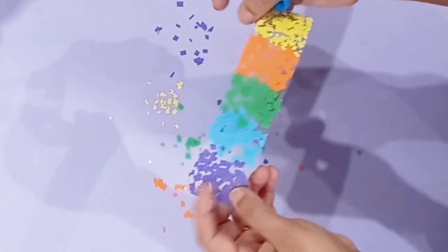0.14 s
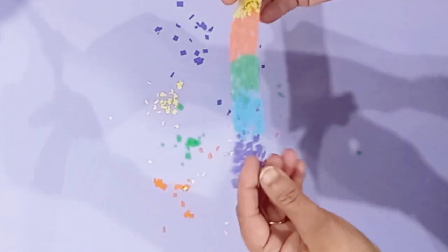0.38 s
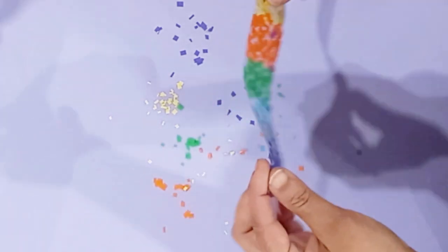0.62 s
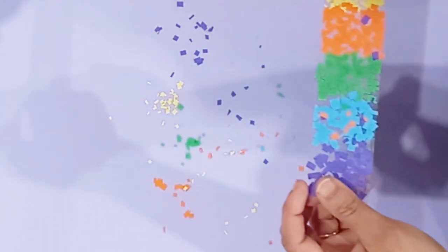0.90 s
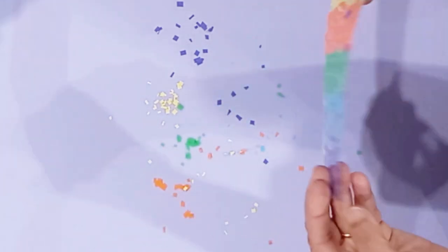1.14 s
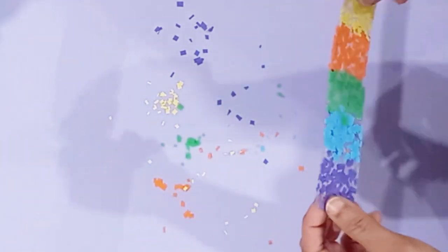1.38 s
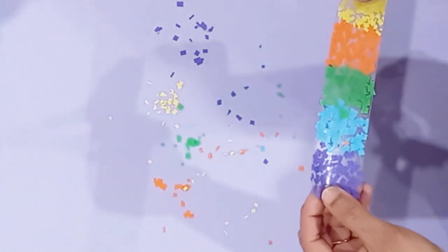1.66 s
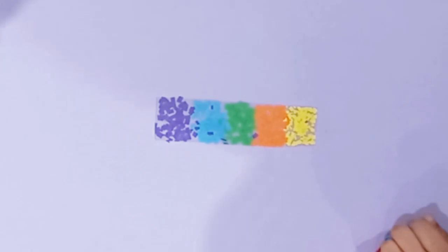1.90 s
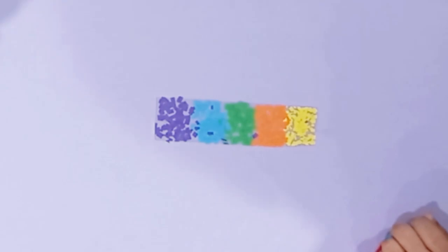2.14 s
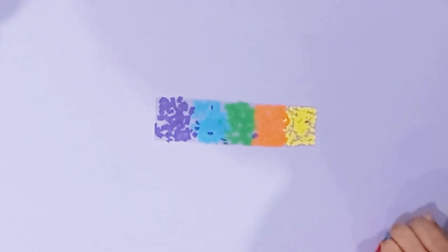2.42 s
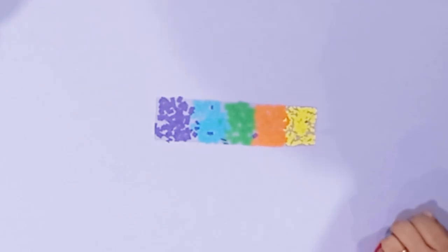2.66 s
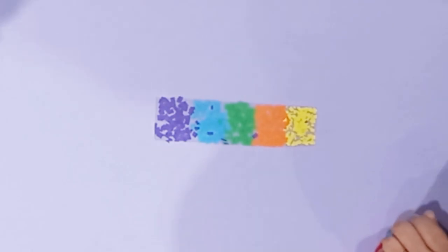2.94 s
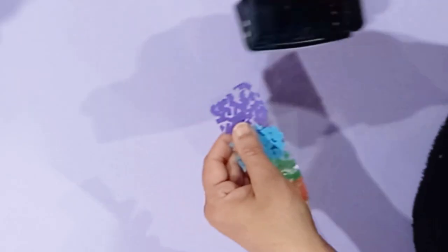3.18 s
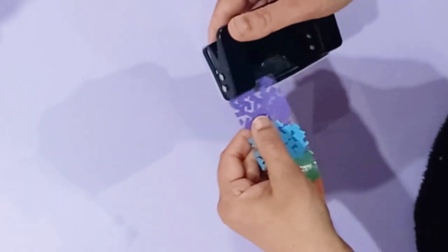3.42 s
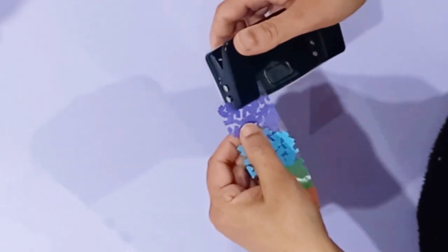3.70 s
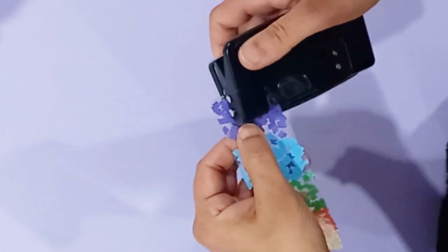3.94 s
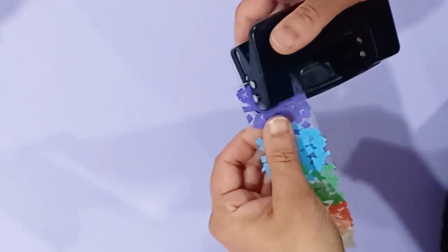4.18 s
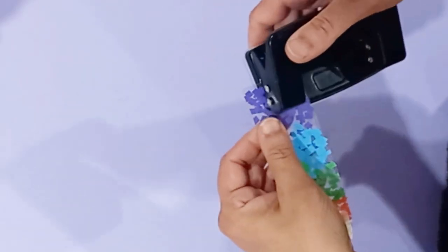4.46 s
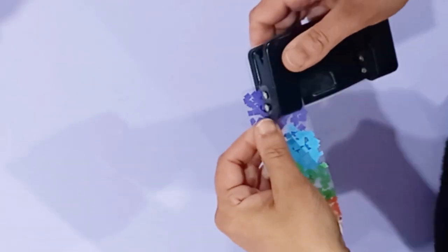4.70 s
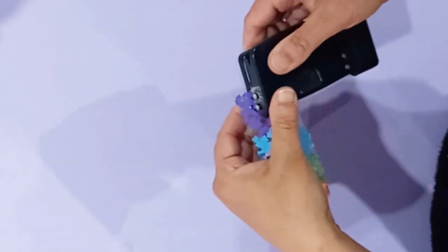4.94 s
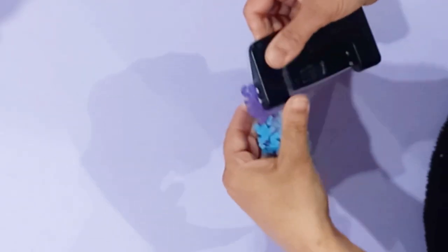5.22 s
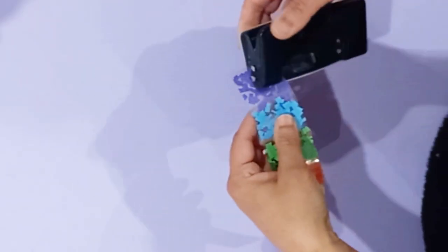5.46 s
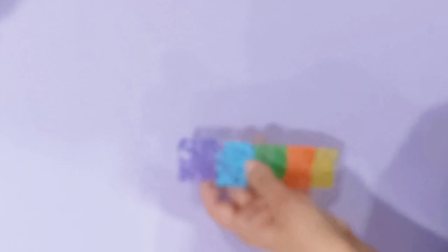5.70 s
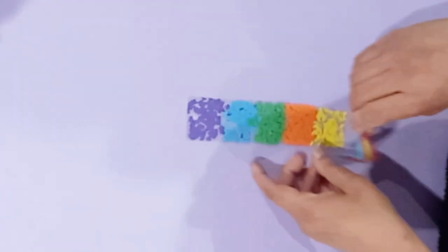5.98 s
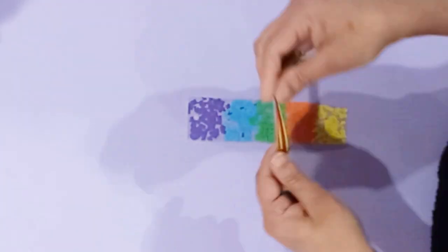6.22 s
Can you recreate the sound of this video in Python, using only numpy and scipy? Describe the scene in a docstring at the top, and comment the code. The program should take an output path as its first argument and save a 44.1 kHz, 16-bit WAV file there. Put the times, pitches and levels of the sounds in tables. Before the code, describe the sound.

Taped paper strip ticks and crinkles in a quiet room, soft table thumps and tool knocks follow, then a hole punch clacks twice.

```python
"""In a small quiet room, hands slide over a strip of taped paper on a table; the tape ticks and crinkles.
Soft thumps in the table top mingle with tools that knock further off and ring while they are pushed about.
Late on, a hole punch creaks, bites and springs back. The sounds are noise bursts sent through resonances.
Three times a moment of sound fades in, breaks off and starts again, as at a splice."""
import sys
import numpy as np
from scipy import signal
from scipy.io import wavfile
from scipy.ndimage import uniform_filter1d

SR = 44100
rng = np.random.default_rng(int(sys.argv[2]) if len(sys.argv) > 2 else 0)


def attenuation_scalar(level_db):
    """Turn a level in dB into a linear amplitude multiplier (20 dB per decade)."""
    decades = np.asarray(level_db, float) / 20
    return 10 ** decades


def store_wav(level_fs):
    """Save 16-bit WAV to argv[1]."""
    pcm = np.round(np.clip(np.atleast_2d(level_fs), -1, 1) * 32767)
    wavfile.write(sys.argv[1], SR, pcm.T.astype(np.int16))


N = 280015  # length in samples


def evened(x):
    """Scales a sound to an rms of 1."""
    return x / np.sqrt(np.mean(x ** 2) + 1e-20)


def peaked(x):
    """Scales a sound so that its highest peak is 1."""
    return x / (abs(x).max() + 1e-20)


def read(points, hz):
    """Reads a table of values over pitch, with pitch on a logarithmic axis."""
    f, value = np.transpose(points)
    return np.interp(np.log(hz + 1), np.log(f + 1), value)


def add(mix, s, sound):
    """Mixes a sound in at time s, cutting off what runs past the end."""
    part = mix[..., round(s * SR):][..., :sound.shape[-1]]
    part += sound[..., :part.shape[-1]]


def band(x, lo_hz, hi_hz):
    """Keeps the pitches between two limits."""
    edges = [lo_hz, min(hi_hz, 0.45 * SR)]
    return signal.sosfilt(signal.butter(2, edges, "band", fs=SR, output="sos"), x)


def resonate(x, hz, width_hz):
    """A resonance of gain 1, at a fixed or moving pitch: shift it to zero, smooth, shift back."""
    turn = np.exp(2j * np.pi * np.cumsum(hz * np.ones(x.shape[-1])) / SR)
    r = np.exp(-np.pi * width_hz / SR)
    return 2 * (turn * signal.lfilter([1 - r], [1, -r], x / turn)).real


def ring(x, modes):
    """Lets a push set off a set of dying sines, one for each way the object can vibrate."""
    t = np.arange(SR // 4) / SR
    sines = sum(attenuation_scalar(db - 60 * t / t60) * np.sin(2 * np.pi * hz * t) for hz, db, t60 in modes)
    return signal.oaconvolve(x, sines)[:len(x)]


def grit(shape, spread_db):
    """Noise whose samples differ widely in size, like many tiny snaps."""
    return rng.standard_normal(shape) * attenuation_scalar(spread_db * np.minimum(rng.exponential(1, shape), 5))


def swell(size, length_s, rise):
    """An envelope that rises over a share of its length and dies away."""
    u = np.arange(size) / SR / max(length_s, 1e-3)
    return np.minimum(u / rise, 1) * np.exp(-(u / 1.61) ** 2)


def bell(size, length_s):
    """An envelope that swells to the middle of its frame and fades alike."""
    return np.exp(-(2 * (np.arange(size) - size // 2) / SR / length_s) ** 2)


def random_patches(noise, tall, wide):
    """Smooths noise over pitch rows and time columns into soft patches of rms 1."""
    return evened(uniform_filter1d(uniform_filter1d(noise, tall, axis=0), wide, axis=1))


def patchy(x, depth_db):
    """Random patches a few hundred hertz wide and some forty milliseconds long swell and sink."""
    hz, t, z = signal.stft(x, SR, nperseg=256)
    patches = random_patches(rng.standard_normal((len(t), len(hz))).T, tall=3, wide=14)
    return signal.istft(z * attenuation_scalar(depth_db * patches), SR, nperseg=256)[1][:, :N]


# Spectrum of the room tone: f/Hz, relative level per hertz/dB
AIR_SPECTRUM = [(15, -100), (25, -59), (64, -18.5), (97, -2), (130, 2.5), (157, -8.5), (223, -2.5),
                (607, -16), (3920, -29), (7000, -37.5), (10500, -36.5), (13600, -25), (16000, -30.5)]
# How alike the room tone is left and right: f/Hz, likeness (1 = the same)
AIR_LIKENESS = [(100, 0.22), (400, 0.021), (2000, 0.0082)]
AIR_DB = -50.5


def room_tone():
    """The still air of the room: random short-time spectra with faint drifting patches."""
    hz = np.fft.rfftfreq(1024, 1 / SR)
    a, b, c, d, noise = rng.standard_normal((N // 256 + 5, 513, 5)).T
    patches = random_patches(noise, tall=10, wide=20)
    same = np.clip(read(AIR_LIKENESS, hz), -1, 1)[:, None]
    left = a + 1j * b
    right = same * left + np.sqrt(1 - same ** 2) * (c + 1j * d)
    colour = attenuation_scalar(read(AIR_SPECTRUM, hz)[:, None] + 0.13 * patches)
    tone = signal.istft(np.array([left, right]) * colour, nperseg=1024, noverlap=768)[1][:, :N]
    return attenuation_scalar(AIR_DB + np.array([[0.8], [-0.8]])) * evened(tone)  # a little louder on the left


# Hands and paper sliding, levels drawn as lines from row to row: t/s, dull rub level/dB, bright hiss level/dB
SLIDE_LEVELS = [(0, -87, -80.5), (.65, -61.5, -66.5), (.85, -71, -73.5), (1.17, -59.5, -64),
                (1.4, -95, -78.5), (2.001, -51.5, -70.5), (2.37, -66, -74), (2.48, -53.5, -72),
                (2.62, -61.5, -64), (2.9, -47.5, -58.5), (2.99, -48.5, -60.5), (3.06, -43, -52.5),
                (3.21, -62.5, -72), (3.7, -66.5, -82.5), (3.92, -54.5, -67), (4.06, -60.5, -75),
                (4.75, -82, -81.5), (4.951, -54.5, -67), (5.2, -67, -71), (5.9, -61.5, -69),
                (6.08, -55, -52.5), (6.105, -63, -74), (6.35, -63, -64.5)]
DRAG_START_S, DRAG_END_S = 1.85, 3.1  # span in which tools are pushed about
DRAG_SHARE = 1.3  # share of the tools' ring in the rub
RUB_PATCHY_DB = 3.5  # the rub catches unevenly, here and there in pitch and time


def slides():
    """Grainy rubbing, unrelated left and right, that wakes two tool resonances while tools are pushed."""
    s, rub_db, hiss_db = np.transpose(SLIDE_LEVELS)
    t = np.arange(N) / SR
    grains = grit((2, N), 6.2)
    dragging = (t > DRAG_START_S) & (t < DRAG_END_S)
    tool_ring = sum(resonate(grains, hz, width) for hz, width, _ in TOOL_RESONANCES[1:3])
    rub = band(grains, 180, 2460) + DRAG_SHARE * dragging * tool_ring
    rub = evened(patchy(rub, RUB_PATCHY_DB))
    hiss = evened(band(grains, 2000, 11060))
    return attenuation_scalar(np.interp(t, s, rub_db)) * rub + attenuation_scalar(np.interp(t, s, hiss_db)) * hiss


# How fast the echo dies at each pitch: f/Hz, time to fall by 60 dB/s
ROOM_DECAY = [(300, 0.067), (2000, 0.19), (14000, 0.088)]


def room(x, start=150):
    """Echoes off the walls: sparse taps of random sign, dying by pitch, other taps on each side."""
    taps = np.zeros((2, SR // 3))
    slots = np.arange(start, SR // 3 - 8, 8)  # one tap in every 8 samples
    at = slots + rng.integers(0, 8, (2, len(slots)))
    np.put_along_axis(taps, at, rng.choice([-1., 1.], at.shape), 1)
    hz, t, z = signal.stft(taps, SR, nperseg=128)
    decay = attenuation_scalar(-60 * t / read(ROOM_DECAY, hz)[:, None])
    tail = signal.istft(z * decay, SR, nperseg=128)[1]
    return signal.oaconvolve(x[None], tail / np.linalg.norm(tail[0]), axes=1)[:, :len(x)]


LAG = 7  # samples by which near sounds reach the right microphone later


def near(x, wet_db):
    """Direct sound, a little later on the right, where the treble's phase wanders at random; room behind."""
    x = band(x, 300, 17000)
    hz, t, z = signal.stft(np.roll(x, LAG), SR, nperseg=128)
    wander = random_patches(rng.standard_normal((len(t), len(hz))).T, tall=3, wide=12)
    phase = np.minimum(hz / 4000, 1.6)[:, None] * wander  # radians, growing with pitch
    right = signal.istft(z * np.exp(1j * phase), SR, nperseg=128)[1][:N]
    return np.array([x, right]) + attenuation_scalar(wet_db) * room(x)


def paper_colour(x, hz, body_db):
    """Broad treble with a soft peak, over the duller body of the sheet."""
    treble = band(x, 1330, 28600) + 2.3 * resonate(x, hz, 870)
    return peaked(treble) + attenuation_scalar(body_db) * peaked(band(x, 470, 4000))


# Single snaps of the tape: start t/s, level/dB, colour f/Hz, low body relative level/dB
TAPE_TICKS = [(0.083, -40.5, 7700, -27), (0.562, -40, 12800, -28), (0.728, -36, 8000, -30.5),
              (0.7344, -30, 8060, -18), (0.7647, -28.5, 7800, -7), (1.5476, -36.5, 10200, -4.5),
              (4.1495, -41, 7350, -2), (4.806, -46, 6000, 1), (5.609, -48, 8850, -20),
              (5.677, -39, 7700, -36), (5.835, -33.5, 8800, -7), (5.9154, -30, 11600, -33),
              (6.241, -40, 8100, -13)]
# Bunches of tiny snaps: middle t/s, level/dB, colour f/Hz, low body relative level/dB, length/s
TAPE_CRINKLES = [(0.118, -53, 7500, -18, 0.027), (0.501, -47, 12000, -4.5, 0.076),
                 (0.697, -45, 11900, -17, .03), (3.889, -50, 8000, 0, 0.033),
                 (3.991, -48, 9900, -11, 0.024), (0.166, -47, 8550, 2.5, 0.0089),
                 (0.312, -41, 8050, -3.5, 0.029), (0.766, -32, 7800, -12, 0.013),
                 (0.929, -32, 5000, -11, 0.0081), (0.94, -28, 10600, -11, 0.023),
                 (1.038, -31.5, 8500, -16, 0.012), (1.072, -36, 11100, -30, 0.0065),
                 (1.191, -31.5, 8200, -6, 0.014), (1.287, -34.5, 9500, -11, 0.0077),
                 (1.302, -28.5, 9700, -15, 0.016), (4.821, -40.5, 10100, -2, 0.013),
                 (5.93, -35, 8700, -34, 0.046)]


def tape():
    """Ticks are one or two milliseconds of snapping; crinkles are longer bunches that swell and fade."""
    out = np.zeros(N)
    for (s, db, hz, body_db), snap in zip(TAPE_TICKS, grit((len(TAPE_TICKS), 1024), 0.5)):
        snap = snap * swell(size=1024, length_s=0.0013, rise=0.3)
        add(out, s, attenuation_scalar(db) * paper_colour(snap, hz, body_db))
    bunches = grit((len(TAPE_CRINKLES), 4096), 2.9)
    for (s, db, hz, body_db, length_s), snaps in zip(TAPE_CRINKLES, bunches):
        start_s = s - len(snaps) / 2 / SR
        snaps = snaps * bell(size=4096, length_s=length_s)
        add(out, start_s, attenuation_scalar(db) * paper_colour(snaps, hz, body_db))
    return out


# Pushes on the table top: middle t/s, level/dB, hardness as rough upper part relative level/dB, length/s
TABLE_THUMPS = [(0.564, -42, -27, 0.016), (1.909, -27, -1.5, 0.035), (2.492, -54, 18.5, 0.064),
                (2.544, -34.5, -2.5, 0.041), (2.724, -39.5, 13.5, 0.044), (2.765, -50, 19, .03),
                (2.864, -41.5, 13, 0.046), (2.93, -47.5, -1, 0.04), (3.035, -38.5, -3, 0.07),
                (5.896, -53, -32, 0.44)]
# Lowest way the table top vibrates: f/Hz, level/dB, time to fall by 60 dB/s
TABLE_MODE = [(129.8, 0, 0.035)]


def thumps():
    """A push rings the table top; its roughness grinds above, and heavy ones shake the floor below."""
    out = np.zeros((2, N))
    table_hz = TABLE_MODE[0][0]
    noises = rng.standard_normal((len(TABLE_THUMPS), 3, 12000))
    for (s, db, hard_db, length_s), rough in zip(TABLE_THUMPS, noises):
        push = bell(size=12000, length_s=length_s)
        grind = push * (rough[2] + 1.35 * rough[:2])  # partly shared by left and right
        hum = push * np.sin(2 * np.pi * table_hz * np.arange(len(push)) / SR)
        low = peaked(ring(hum, TABLE_MODE)) + 0.55 * peaked(resonate(grind, table_hz, 53))
        floor = attenuation_scalar(db + 18.5) * peaked(band(grind, 61, 97))  # grows faster than the thump itself
        upper = band(grind, 100, 1270) + 5.7 * band(grind, 84, 380) + 1.8 * resonate(grind, 592, 76)
        thump = low + floor + attenuation_scalar(hard_db) * peaked(upper)
        add(out, s - len(push) / 2 / SR, attenuation_scalar(db) * thump)
    return out * attenuation_scalar(np.array([[1.2], [-1.2]]))  # a little louder on the left


# Tools knocking further off: start t/s, level/dB, treble relative level/dB
TOOL_KNOCKS = [(1.8946, -22, -1.5), (2.2186, -28.5, -10), (2.2695, -26, -14), (2.3994, -37, -37),
               (2.6496, -28.5, -14), (2.8527, -26.5, -40)]
# Resonances of a tool, two of them also woken by sliding: f/Hz, width/Hz, relative level/dB
TOOL_RESONANCES = [(1340, 620, -4), (2354, 72, -5), (399, 45, -7), (632, 61, -14.5), (7310, 130, -14.5)]


def knocks():
    """A short rattle rings the tool under a broad clatter; it reaches us mostly by the walls."""
    out = np.zeros((2, N))
    for (s, db, treble_db), rattle in zip(TOOL_KNOCKS, grit((len(TOOL_KNOCKS), 8192), 2.6)):
        rattle = rattle * swell(size=8192, length_s=0.0073, rise=0.17)
        rung = sum(attenuation_scalar(level_db) * resonate(rattle, hz, width) / np.sqrt(width)
                   for hz, width, level_db in TOOL_RESONANCES)
        body = peaked(rung) + 0.39 * peaked(band(rattle, 840, 6400))
        knock = peaked(body) + attenuation_scalar(treble_db) * peaked(band(rattle, 1840, 10600))
        add(out, s, attenuation_scalar(db) * peaked(0.11 * knock + room(knock, start=20)))
    return out


# Blows inside the punch: start t/s, level/dB, housing f/Hz, crack relative level/dB
PUNCH_BLOWS = [(4.6345, -31, 1850, -9), (5.0495, -12.5, 1450, -3), (5.0605, -26, 1500, 6),
               (5.3245, -44, 1500, 11), (5.3815, -13, 1700, -2), (5.4625, -36, 1600, -3)]
# Ringing of the punch's metal: f/Hz, relative level/dB, time to fall by 60 dB/s
PUNCH_METAL = [(1152, 24, 0.081), (2420, 22, 0.072), (4740, -8, 0.081), (9360, 26, 0.052)]


def punch_blows():
    """Each blow knocks the housing, rings the metal and cracks."""
    out = np.zeros(N)
    for (s, db, hz, crack_db), noise in zip(PUNCH_BLOWS, grit((len(PUNCH_BLOWS), 4096), 1.1)):
        hit = noise * swell(size=4096, length_s=0.0035, rise=0.3)
        # two resonances in a row make the knock build up over a cycle or two
        knock = resonate(resonate(signal.unit_impulse(len(hit)), hz, 280), hz, 280)
        clatter = peaked(band(hit, 400, 2800))
        metal = peaked(ring(hit, PUNCH_METAL))
        crack = attenuation_scalar(crack_db) * peaked(band(hit, 2800, 19000))
        add(out, s, attenuation_scalar(db) * (peaked(knock) + 0.3 * clatter + 0.1 * metal + crack))
    return out


# The lever scrapes and the paper crunches:
# full pressure t/s, level/dB, housing f/Hz, hold/s, release speed/(dB per s)
PUNCH_STROKES = [(4.659, -43.5, 1820, 0.021, 496), (5.044, -24, 1400, 0.022, 347),
                 (5.257, -57, 1540, 0.0081, 200), (5.346, -31, 1670, 0.033, 548)]
PRESS_DB_PER_S = 1800  # how fast the pressure builds up
CLIMB_PER_S = 3.9  # share by which the housing pitch climbs under load
HISS_DB, HISS_PER_DB = 2.5, 1.1  # harder strokes crunch brighter
HISS_FADE_DB_PER_S = 69  # extra fading of the hiss after the hold


def punch_strokes():
    """Slips of the lever and paper scrape into the housing, whose pitch climbs and sinks with the load."""
    out = np.zeros(N)
    t = np.arange(-2048, 8192) / SR  # seconds from full pressure
    for (s, db, hz, hold_s, release), slips in zip(PUNCH_STROKES, grit((len(PUNCH_STROKES), len(t)), 2.9)):
        after = np.maximum(t - hold_s, 0)
        pressure = attenuation_scalar(db + PRESS_DB_PER_S * np.minimum(t, 0) - release * after)
        load_s = np.clip(np.minimum(t, 2 * hold_s - t), 0, None)  # up during the hold, then back
        loaded_hz = hz * (1 + CLIMB_PER_S * load_s)
        housing = evened(resonate(resonate(slips, loaded_hz, 350), loaded_hz, 600))
        scrape = evened(band(slips, 1000, 3500))
        upper = evened(resonate(slips, 2400, 700))
        body = housing + 0.8 * scrape + 0.6 * upper
        hiss_level = attenuation_scalar(HISS_DB + HISS_PER_DB * db - HISS_FADE_DB_PER_S * after)
        hiss = hiss_level * evened(band(slips, 4000, 10500))
        add(out, s + t[0], pressure * (evened(body) + hiss))
    return out


def scene():
    """All sources in the room; the microphone lifts the high treble of all but thumps and room tone."""
    punch = punch_blows() + punch_strokes()
    mix = slides() + near(tape(), wet_db=-10.0) + knocks() + near(punch, wet_db=-13.5)
    lift = 1.214 * resonate(mix, 13200, 4700)
    return room_tone() + mix + lift + thumps()


# Starts of the stutters: t/s
STUTTER_TIMES = [1.846, 3.0562, 5.615]
STUTTER_S = 1866 / SR  # length of the repeated moment


def stutter(dry):
    """At each start a short moment fades in, breaks off and begins again, this time running on."""
    out, size = dry.copy(), round(STUTTER_S * SR)
    fade = np.clip((np.arange(size) / SR - 0.002) / 0.016, 0.03, 1)
    for s in STUTTER_TIMES:
        at = round(s * SR)
        moment = dry[:, at + size:at + 2 * size] * fade
        out[:, at:at + 2 * size] = np.tile(moment, 2)
    return out


def top_cut(x):
    """Nothing passes above the cut-off."""
    return signal.sosfilt(signal.butter(12, 16820, fs=SR, output="sos"), x)


def record(dry):
    """Stutters the sound and cuts off everything above a steep upper limit."""
    low_pass = signal.firwin(511, 15880, window=("kaiser", 8), fs=SR)  # limit in Hz
    mix = signal.oaconvolve(stutter(dry), low_pass[None], "same")
    return top_cut(mix)


dry = scene()
out = record(dry)
store_wav(out)
```